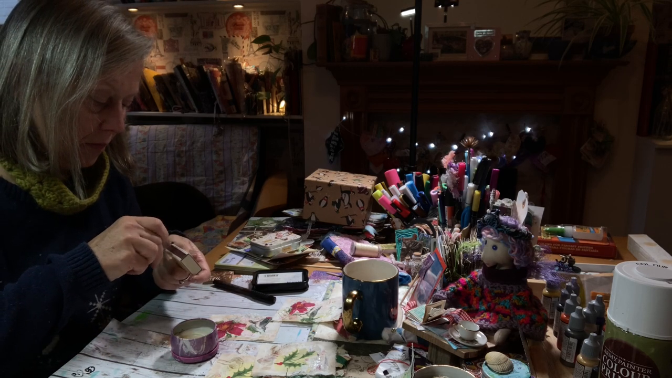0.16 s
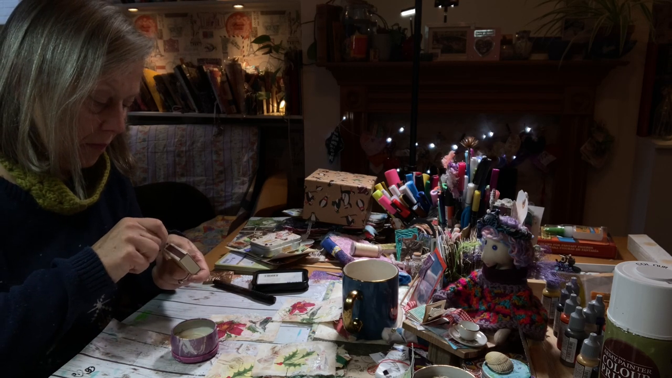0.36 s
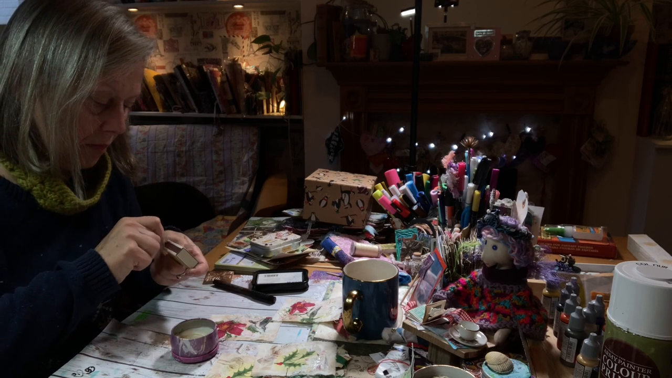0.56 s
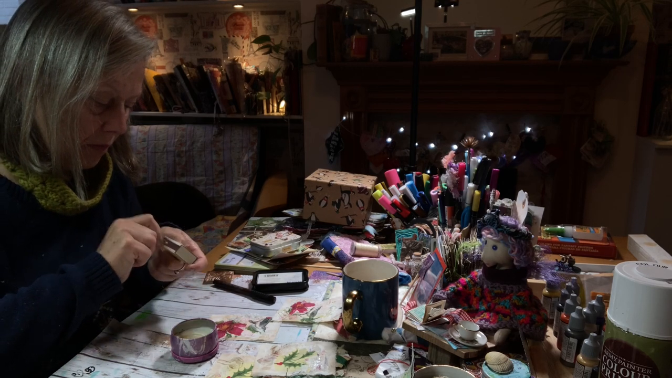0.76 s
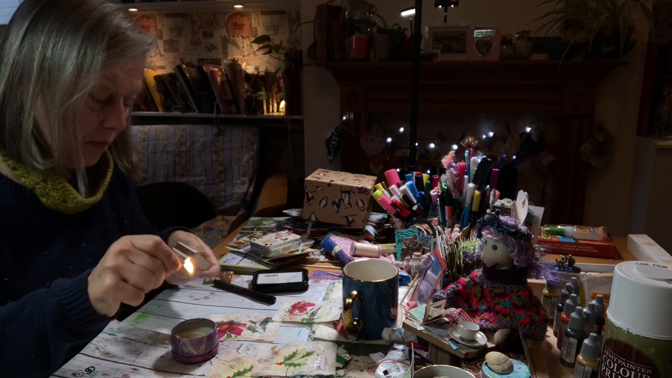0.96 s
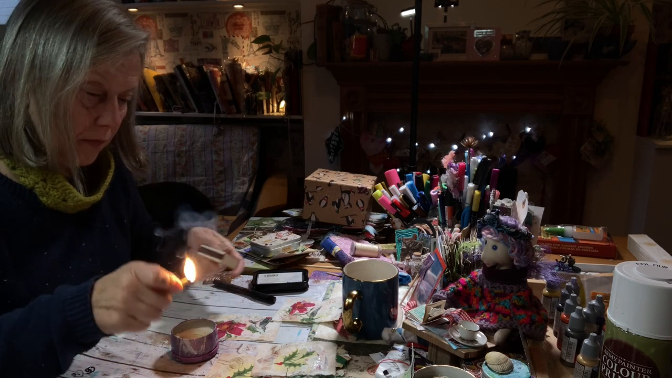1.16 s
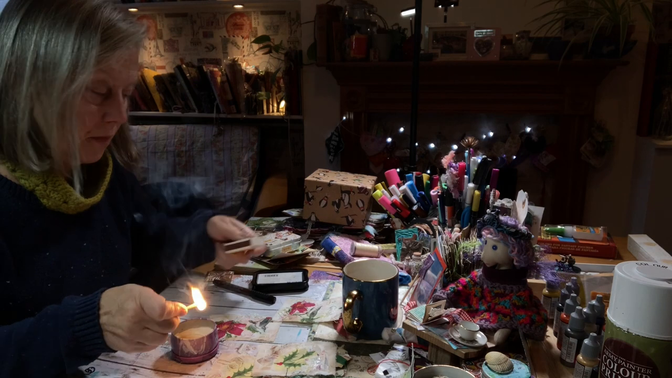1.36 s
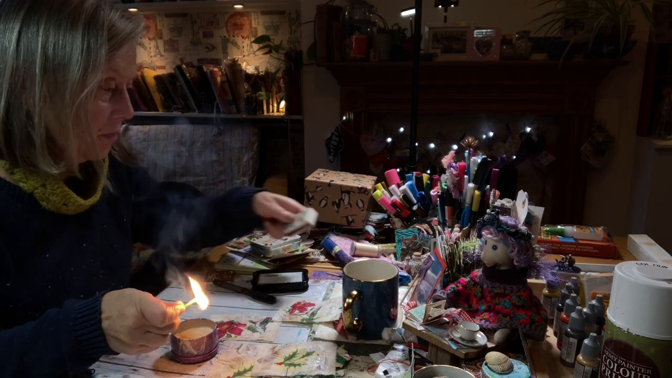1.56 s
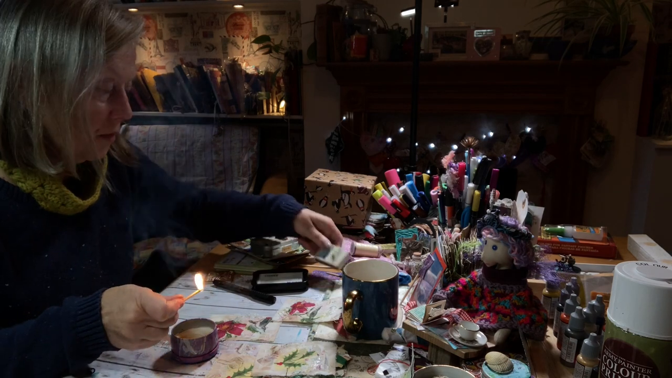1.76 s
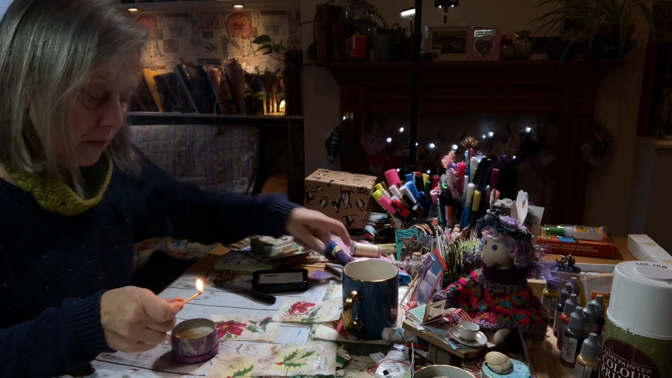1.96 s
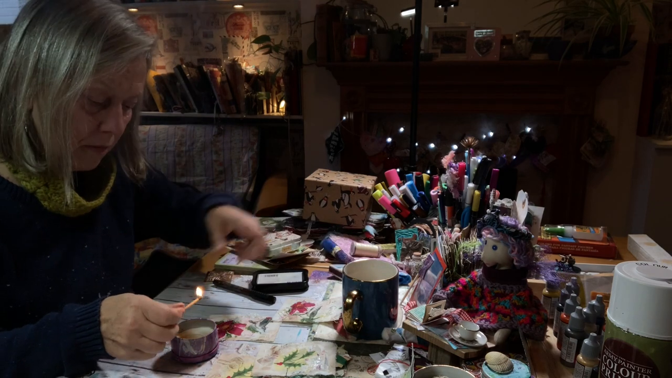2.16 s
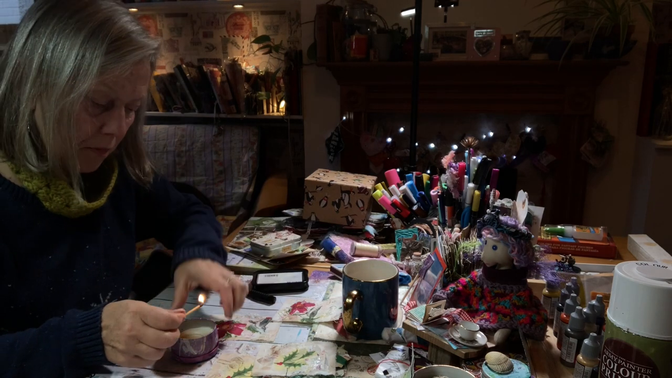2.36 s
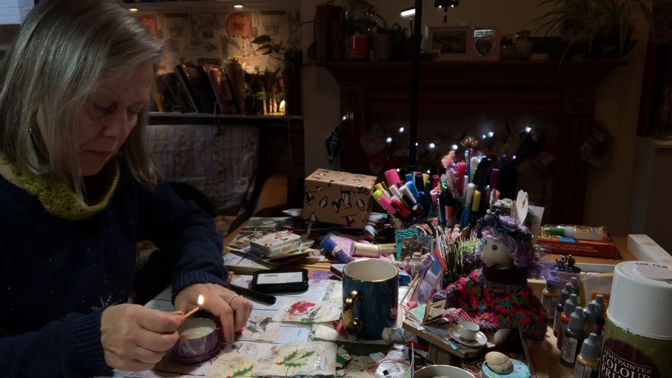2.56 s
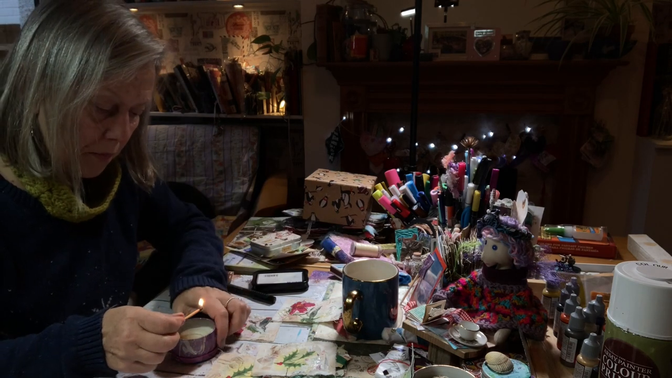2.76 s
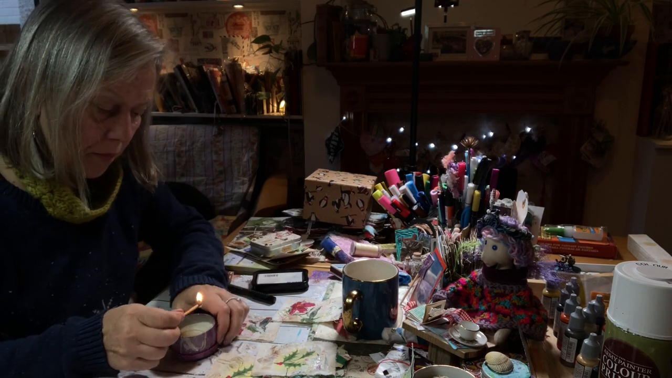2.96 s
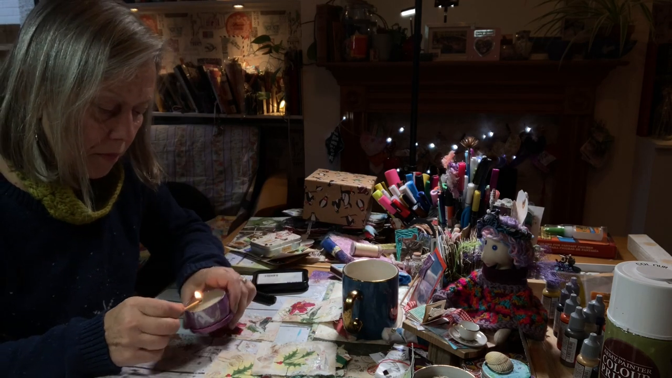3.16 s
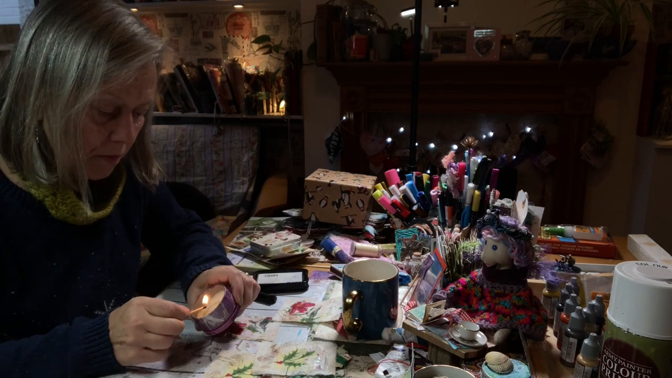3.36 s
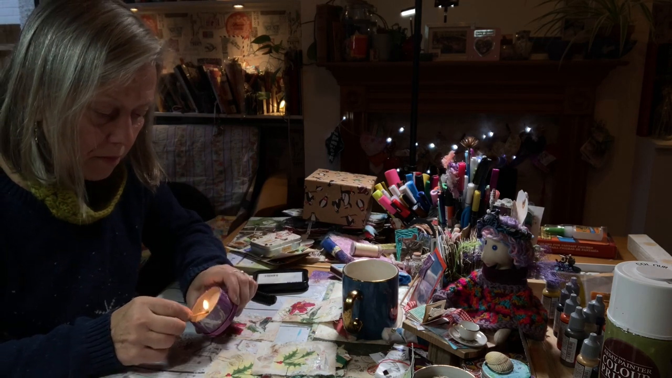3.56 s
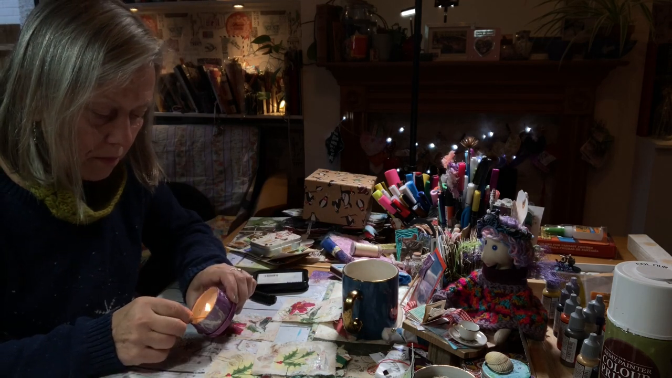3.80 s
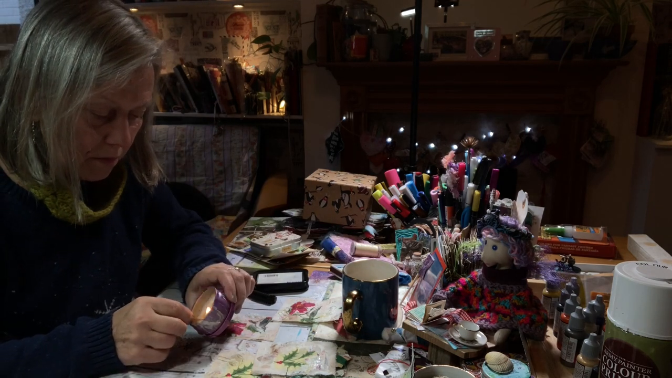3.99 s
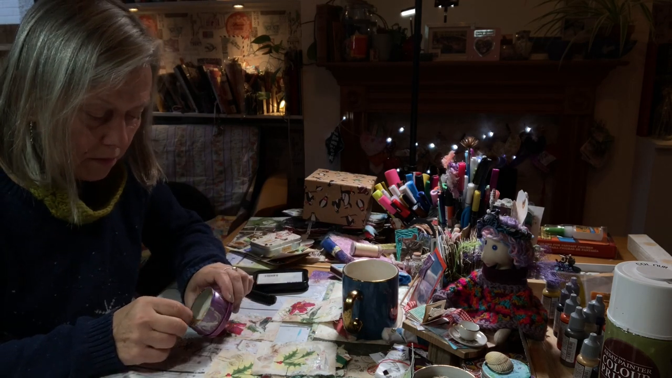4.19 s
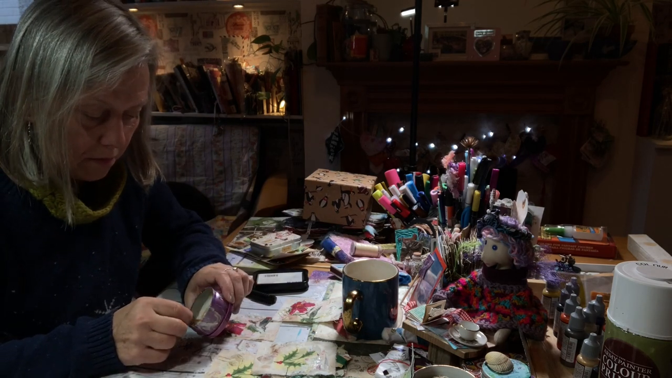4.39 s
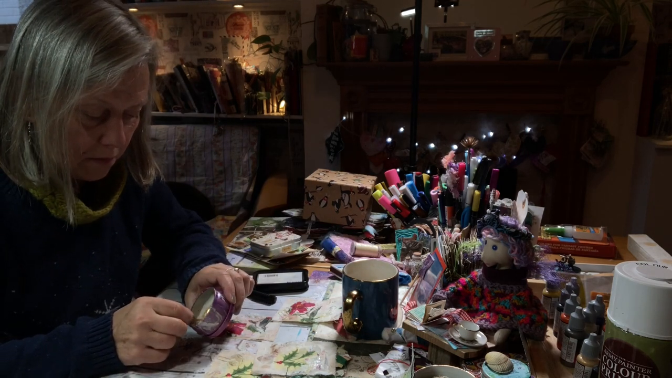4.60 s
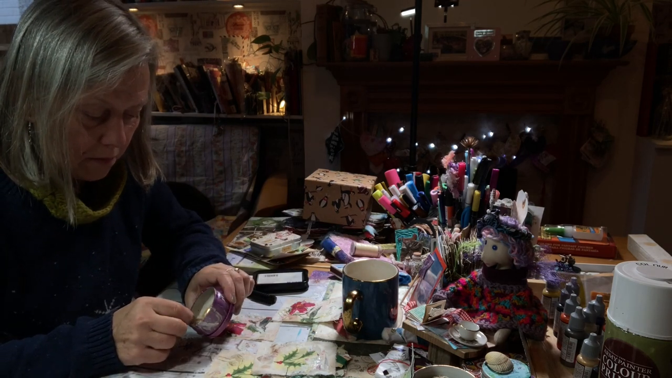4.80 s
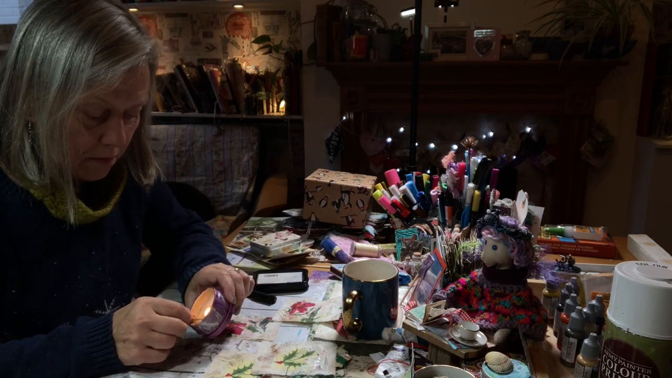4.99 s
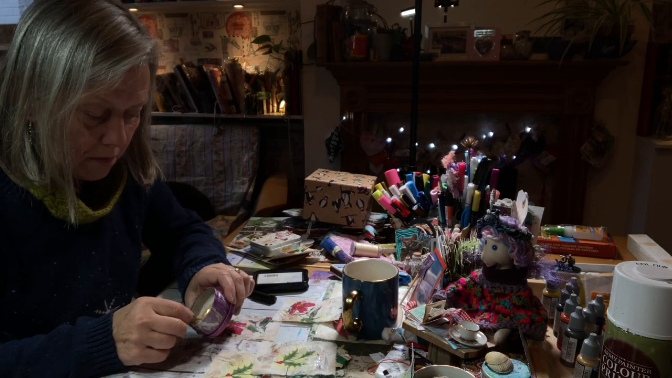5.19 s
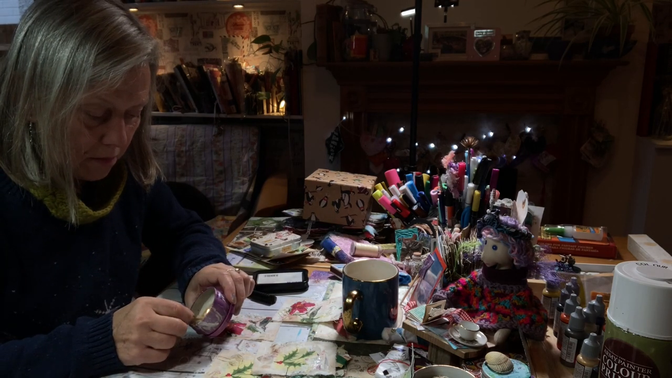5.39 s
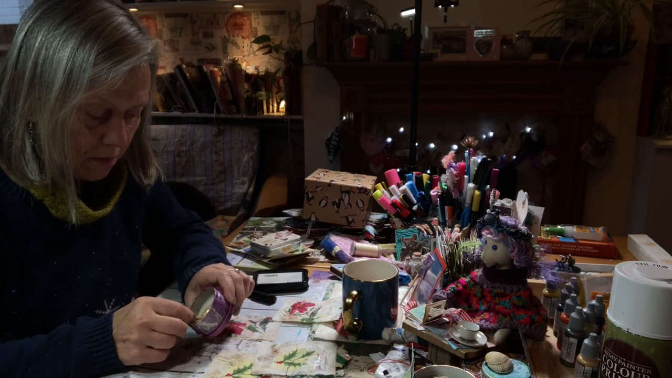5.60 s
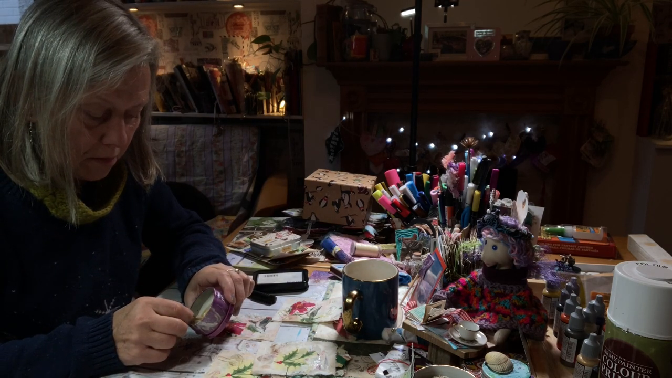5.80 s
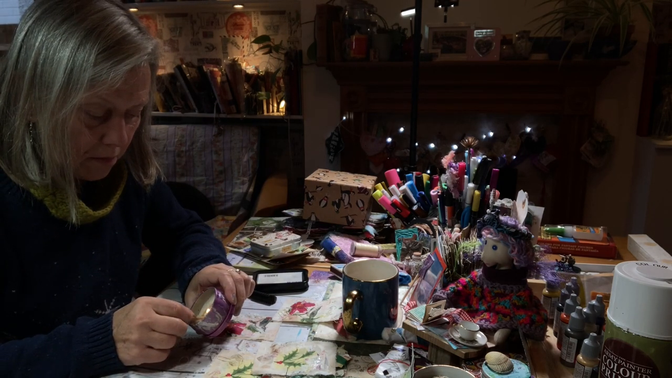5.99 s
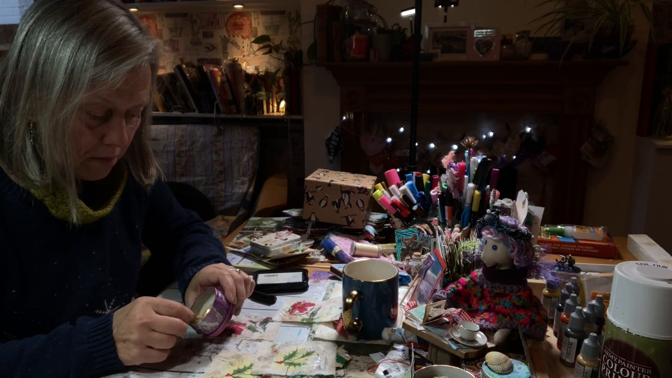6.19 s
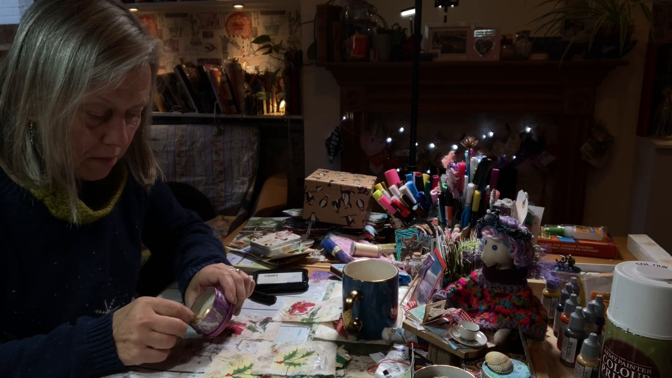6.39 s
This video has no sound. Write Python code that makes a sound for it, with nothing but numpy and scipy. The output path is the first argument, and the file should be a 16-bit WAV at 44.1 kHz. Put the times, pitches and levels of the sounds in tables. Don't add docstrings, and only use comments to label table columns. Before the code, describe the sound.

A wooden match is struck with one sharp rasp, hisses softly as it flares, then the box drops with a rattle and light taps follow.

```python
import sys
import numpy as np
from scipy import signal
from scipy.fft import rfft, irfft
from scipy.io import wavfile
from scipy.ndimage import uniform_filter1d, map_coordinates

SR = 44100
rng = np.random.default_rng(int(sys.argv[2]) if len(sys.argv) > 2 else 0)


def how_loud(loudness_db):
    steps = np.asarray(loudness_db, float) / 20
    return 10 ** steps


def persist_wave(psi):
    counts = np.round(np.clip(psi, -1, 1) * 32767).astype(np.int16)
    wavfile.write(sys.argv[1], SR, np.atleast_2d(counts).T)


N = 284445


def rms_one(x):
    return x / np.sqrt(np.mean(x ** 2) + 1e-20)


def peak_one(x):
    return x / np.abs(x).max()


def in_time(rows, fade_s=.02):
    s, *columns = np.transpose(rows)
    s = np.r_[s[0] - fade_s, s, s[-1] + fade_s]
    return [np.interp(np.arange(N) / SR, s, np.r_[-110, c, -110]) for c in columns]


def at_hz(points, hz):
    table_hz, values = np.array(points)[:, 0], np.array(points)[:, 1]
    return np.interp(np.log(hz + 1), np.log(table_hz), values)


def drift(rate_hz):
    r = np.exp(-2 * np.pi * rate_hz / SR)
    settle = 20000
    wander = signal.lfilter([1], [1, -2 * r, r * r], rng.standard_normal(N + settle))
    return rms_one(wander[settle:])


def resonances(x, peaks):
    out = 0
    for k, (hz, width, level_db) in enumerate(peaks):
        r = np.exp(-np.pi * width / SR)
        feedback = [1, -2 * r * np.cos(2 * np.pi * hz / SR), r * r]
        ring = signal.lfilter([(1 - r * r) / 2, 0, (r * r - 1) / 2], feedback, x + 1e-18)
        out = out + (-1) ** k * how_loud(level_db) * ring
    return out


def grains(per_s, spread_db):
    sizes = how_loud(spread_db * np.minimum(rng.exponential(1, N), 4)) * rng.choice([-1, 1], N)
    return rms_one(sizes * (rng.random(N) < per_s / SR))


# (frequency [Hz], left-right likeness [0-1])
LIKENESS = [(60, 0.95), (290, 0.87), (640, 0.6), (1400, 0.06), (3100, 0.091), (6000, 0.039)]


def diffuse(mid, side):
    alike = np.clip(at_hz(LIKENESS, np.fft.rfftfreq(len(mid), 1 / SR)), 0, 1)
    common = np.sqrt(1 + alike) * rfft(mid)
    opposite = np.sqrt(1 - alike) * rfft(side) * np.array([[1], [-1]])
    return irfft(common + opposite, len(mid)) / np.sqrt(2)


# (frequency [Hz], level [dB per Hz])
ROOM_TONE = [(25, -15), (85, 1), (200, -5), (380, -15), (1000, -22.5), (5000, -33.5), (9000, -31),
             (15000, -33)]


def room_tone():
    colour = how_loud(at_hz(ROOM_TONE, np.fft.rfftfreq(N, 1 / SR)))
    rumble = irfft(rfft(rng.standard_normal((2, N))) * colour, N)
    return how_loud(-60.5) * rms_one(diffuse(*rumble))


def contacts(rows):
    out, n = np.zeros(N), 1024
    t = np.arange(n) / SR
    for s, body_db, hz, crack_db, crack_hz in rows:
        i = round(s * SR)
        splinter, skin = rng.standard_normal((2, n))
        brush = resonances(skin, [(hz, 0.32 * hz, 0)]) * how_loud(-900 * t[::-1])
        snap = splinter * np.exp(-t / .0004)
        knock = resonances(np.exp(-t / .00005) + .3 * snap, [(hz, .7 * hz, 0)])
        body = resonances(knock, [(hz, 0.19 * hz, 0), (1.9 * hz, 1.2 * hz, -14)])
        split = resonances(snap, [(crack_hz, .4 * crack_hz, 0)])
        crack = resonances(split, [(crack_hz, 0.2 * crack_hz, 0), (13000, 4000, -12)])
        out[i - n:i] += how_loud(body_db - 19.5) * peak_one(brush)
        out[i:i + n] += how_loud(body_db + 1.5) * peak_one(body)
        out[i:i + n] += how_loud(crack_db + 6.5) * peak_one(crack)
    return out


# (time [s], level [dB], body [Hz])
KNOCKS = [(.398, -49, 1106), (0.3973, -42.5, 3720), (1.923, -26, 1150), (1.9285, -35.5, 680),
          (2.2475, -49.5, 1410), (2.4418, -45.5, 2780), (2.4423, -47, 890), (2.45, -46.5, 2420),
          (2.458, -49, 770), (2.7453, -48, 1130), (2.7832, -48, 1020), (3.1981, -58.5, 2080),
          (3.2719, -41, 1103), (3.2716, -41, 2500), (4.9953, -46, 1050)]


def knocks():
    return contacts([(s, db, hz, db - 9, 1.5 * hz) for s, db, hz in KNOCKS])


# (time [s], level [dB])
THUMPS = [
    (.3982, -50),
    (0.7236, -62),
    (.7763, -22),
    (1.9237, -33),
    (2.45, -36.5),
    (2.4605, -35.5),
    (2.7812, -52),
    (3.2717, -46),
    (4.9838, -40.5),
    (4.988, -42.5),
]
# (frequency [Hz], width [Hz], level [dB])
THUD = [(86, 30, -4), (130, 50, 1), (290, 130, 0), (654.3, 200, -3)]


def thumps():
    pushes = np.zeros(N)
    for s, thump_db in THUMPS:
        pushes[round(s * SR)] = how_loud(thump_db - 3.5)
    one_push = np.arange(1024) == 0
    return resonances(pushes, THUD) / np.abs(resonances(one_push, THUD)).max()


# (time [s], level [dB], body [Hz], splinter over the body [dB])
CLACKS = [(0.3985, -36, 2800, -7), (0.7235, -56, 4830, -4), (1.649, -48, 3000, -3.5),
          (1.7235, -60, 5950, -2.5), (1.923, -27.5, 2400, -5.5), (1.926, -27, 1300, -12),
          (1.9809, -35.5, 3540, -5.5), (2.2003, -55.5, 1400, 2.5), (2.4497, -33, 5100, 1.5),
          (2.4555, -39, 4570, -4), (2.4605, -41.5, 3500, -1), (2.473, -54, 3000, 7.5),
          (2.5002, -46.5, 4600, 7), (2.7815, -39.5, 4990, -5.5), (2.783, -43.5, 2350, -26.5),
          (2.8873, -51, 4846, -5), (3.4789, -60, 1808, 5), (4.9873, -41, 3785, -5),
          (4.9883, -33, 1790, -15), (4.9912, -46.5, 7200, -7), (5.7425, -61, 4700, -6)]


def clacks():
    return contacts([(s, db, hz, db + over_db, 8700) for s, db, hz, over_db in CLACKS])


# (time [s], level [dB])
TICKS = [
    (.3999, -57),
    (1.924, -33),
    (2.45, -39),
    (4.9908, -46),
    (5.6402, -59.5),
    (5.663, -47),
    (5.6929, -53),
    (5.7377, -54),
    (5.8652, -62),
    (5.8827, -64.5),
]


def ticks():
    return contacts([(s, db - 13.5, 2500, db, 12800) for s, db in TICKS])


# (frequency [Hz], time to fall 60 dB [s], level [dB])
ROOM = [(103, .6, 5), (246, 0.16, 4.5), (615, 0.54, 0.5), (1400, 0.27, 1.5), (3278, 0.38, 2),
        (6850, 0.16, -7), (13000, 0.18, -8)]


def room(x):
    t, tail = np.arange(SR // 2) / SR, 0
    white = rng.standard_normal((2, SR // 2))
    for hz, t60, level_db in ROOM:
        sos = signal.butter(1, [hz / 1.6, hz * 1.5], "band", fs=SR, output="sos")
        tail = tail + signal.sosfilt(sos, white) * how_loud(level_db - 60 * t / t60)
    build_up = np.clip((t - .002) / 0.0029, 0, 1)
    tail = rms_one(diffuse(*tail) * build_up) / np.sqrt(len(t))
    return signal.fftconvolve(x[None], tail, axes=1)[:, :N]


def expander(x, knee_db, smooth_s):
    power = uniform_filter1d(np.mean(x ** 2, axis=0), size=int(smooth_s * SR))
    return x * power / (power + how_loud(2 * knee_db))


# (time [s], level [dB])
STROKE = [
    (.748, -66),
    (.7625, -50),
    (.7635, -35),
    (.769, -30),
    (.772, -12.5),
    (.7765, -9),
    (.7815, -12),
    (.784, -26),
    (.86, -55),
]
# (frequency [Hz], width [Hz], level [dB])
GRIT = [(118, 52, -3.5), (402.2, 210, -5), (705, 350, -5.5), (1300, 440, -2.5), (2400, 960, -3.5),
        (3470, 1200, -5), (5548, 1200, -8), (8340, 910, 4), (12000, 3000, 1), (16700, 1600, 2.5)]


def strike():
    level_db = in_time(STROKE)[0]
    grit = resonances(grains(14000, 2.2), GRIT)
    dull = signal.sosfilt(signal.butter(2, 5000, fs=SR, output="sos"), grit)
    bite = np.clip((level_db + 41.0) / 25, 0, 1)
    return how_loud(level_db + 1.5) * (bite * rms_one(grit) + (1 - bite) * rms_one(dull))


def patchy_hiss(bands, patch_db, patch_hz, spread_db):
    return sum(how_loud(patch_db * drift(patch_hz)) * resonances(grains(9000, spread_db), [band]) for band in bands)


# (time [s], vigour [dB], spread of the flame [head -1 to wood 1])
FLARE = [
    (.88, -48, 0.42),
    (.92, -52, -0.21),
    (1.03, -50, -0.88),
    (1.2, -50.5, -0.95),
    (1.32, -48, -0.17),
    (1.44, -50, 0.23),
    (1.53, -49, 1),
    (1.64, -50.5, -0.017),
    (1.746, -77.5, 1.07),
]
# (level at even spread [dB], gain [dB per unit of spread])
FLAME_PARTS = [
    (-4.5, -5),
    (0.54, 3.5),
    (1.86, 4.5),
    (-2.5, -7.5),
]
# (frequency [Hz], width [Hz], level [dB])
LOW_JETS = [(1614, 380, 6), (2001, 400, -5)]
HIGH_JETS = [(2500, 700, 6), (3312, 900, -1.5), (4500, 880, -7.5), (5900, 1500, -5.5)]


def flare():
    vigour_db, spread = in_time(FLARE, fade_s=0.021)
    sputter = how_loud(1.3 * drift(40))
    low = sputter * patchy_hiss(LOW_JETS, 1.3, 6.7, 3.0)
    high = sputter * patchy_hiss(HIGH_JETS, 1.3, 6.7, 3.0)
    puffs = how_loud(2.5 * drift(20))
    flutter = puffs * resonances(rng.standard_normal(N), [(170.5, 160, 1.5), (591.9, 630, -2.0)])
    fine_bands = [(4600, 430, 4), (6800, 1200, 0.0), (9200, 2500, 4), (12990, 4000, -4.5)]
    sizzle = patchy_hiss(fine_bands, 2.4, 5.0, 4.1)
    out = 0
    for layer, (even_db, gain_db) in zip((low, high, flutter, sizzle), FLAME_PARTS):
        level_db = vigour_db + even_db + gain_db * np.clip(spread, -2, 2)
        out = out + how_loud(level_db - 2.32) * rms_one(layer)
    return out


# (time [s], echo delay [ms])
TABLE_ECHO = [
    (.85, 0.51),
    (1.2, 0.46),
    (1.45, .52),
    (1.8, 0.48),
]


def table_echo(x, echo_db):
    now = np.arange(N)
    delay = np.interp(now / SR, *np.transpose(TABLE_ECHO)) * SR / 1000
    return x + how_loud(echo_db) * map_coordinates(x, [now - delay], order=3, mode="nearest")


# (start [s], length [s], level [dB], centre [Hz])
RUBS = [
    (1.828, 0.043, -67.5, 1190),
    (1.98, 0.2, -57.5, 130),
    (2.067, 0.12, -58, 1400),
    (2.22, 0.066, -66, 1470),
    (2.601, 0.076, -71.5, 3810),
    (2.599, 0.049, -72, 5960),
    (2.777, 0.061, -64.5, 2180),
    (2.785, 0.048, -67, 5000),
    (3.462, 0.041, -68.5, 1850),
    (4.182, 0.022, -73.5, 2500),
]


def rubs():
    out, t, friction = np.zeros(N), np.arange(N) / SR, grains(2700, 1.3)
    for s, length, level_db, hz in RUBS:
        swell = np.sin(np.pi * np.clip((t - s) / length, 0, 1))
        rough = resonances(friction, [(hz, 0.5 * hz, 0)])
        out += how_loud(level_db) * swell * rms_one(resonances(rough, [(hz, 0.25 * hz, 0)]))
    return out


# (time [s], level [dB], fading [dB per s])
JOLTS = [
    (1.932, -34.5, 503),
    (1.955, -48, 121),
    (2.134, -51, 200),
    (2.25, -47.5, 450),
]


def jolts(fading):
    t, gain = np.arange(N) / SR, 0
    for s, level_db, db_per_s in JOLTS:
        fall_db = np.maximum(905 * (s - t), fading * db_per_s * (t - s))
        gain = gain + how_loud(level_db - fall_db)
    return gain


# (frequency [Hz], width [Hz], level [dB])
BOX = [(680, 158, -3.5), (1150, 110, 5.5), (1400, 280, 4), (1850, 290, -2.5), (2635, 350, -2.5)]


def settling_matches():
    soften = signal.butter(2, 2100, fs=SR, output="sos")
    rattle = signal.sosfilt(soften, resonances(grains(900, 1.8), BOX))
    drone = resonances(grains(200, 1.5), [(201, 32, 6.5), (280, 192, 0.0), (469, 23, -2.5)])
    return how_loud(-7.5) * jolts(1) * rms_one(rattle) + how_loud(-11) * jolts(0.57) * rms_one(drone)


# (time [s], level [dB])
TAPS = [
    (3.6983, -65),
    (3.8341, -59.5),
    (4.1895, -60),
    (4.6658, -48),
    (4.6742, -52.5),
    (4.9011, -57),
    (4.9834, -38),
    (4.9971, -40),
    (5.2775, -56.5),
    (5.7754, -61),
]


def taps():
    return contacts([(s, db, 1790, db - 11.5, 4640) for s, db in TAPS])


def scene():
    hands = knocks() + thumps() + clacks() + ticks() + rubs() + settling_matches() + taps()
    scrape = strike()
    hiss = table_echo(flare(), echo_db=-17.0)
    soft_hands = signal.lfilter([.4], [1, -.6], hands)
    wet = room(how_loud(-3.0) * scrape + how_loud(-7.5) * hiss + how_loud(-3.5) * soft_hands)
    near = scrape + hiss + hands + expander(wet, knee_db=-60, smooth_s=.012)
    return signal.sosfilt(signal.butter(2, 60, "high", fs=SR, output="sos"), near) + room_tone()


def band_limit(x):
    return signal.sosfilt(signal.butter(12, 16290, fs=SR, output="sos"), x)


# (frequency [Hz], share [0-1])
SHARED = [(4500, 0.02), (6400, .25), (8000, 0.94), (16000, 1)]
# (frequency [Hz], lift [dB])
RIGHT_LIFT = [(300, 0.55), (1500, 1.5), (5000, 2.5), (8000, -0.27)]


def record(dry):
    hz, (left, right) = np.fft.rfftfreq(N, 1 / SR), rfft(dry)
    share = np.clip(at_hz(SHARED, hz), 0, 1)
    delay_turn = np.exp(-2j * np.pi * (hz - 8800) / 5050)
    shared = np.sqrt(share) * left * delay_turn
    later = np.exp(-1j * 0.61 * np.clip(hz / 2500, 0, 8) ** 0.61)
    own = np.sqrt(1 - share) * right * later
    right = (shared + own) * how_loud(at_hz(RIGHT_LIFT, hz))
    top_cut = signal.cheby2(12, 70, 16600, fs=SR, output="sos")
    mix = signal.sosfilt(top_cut, irfft(np.array([left, right]), N))
    return band_limit(np.clip(mix, -1, 1))


dry = scene()
out = record(dry)
persist_wave(out)
```